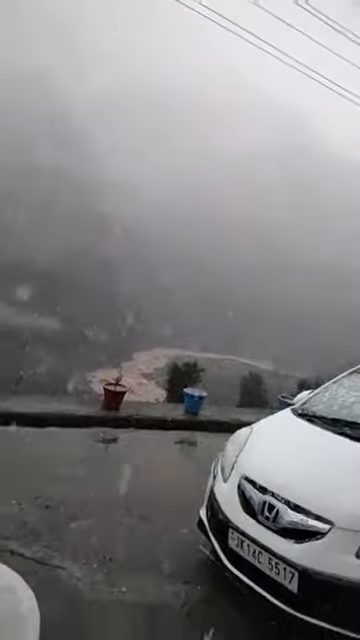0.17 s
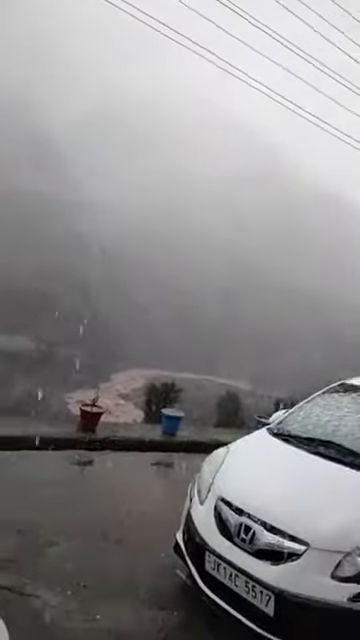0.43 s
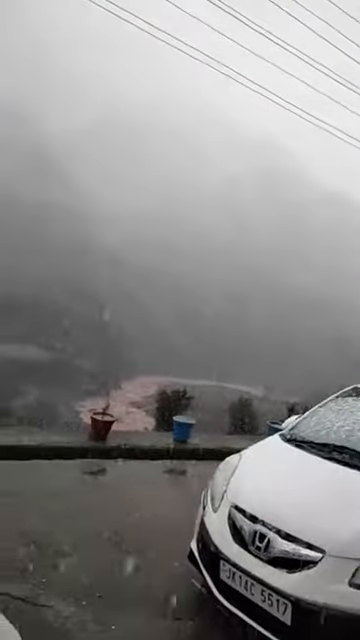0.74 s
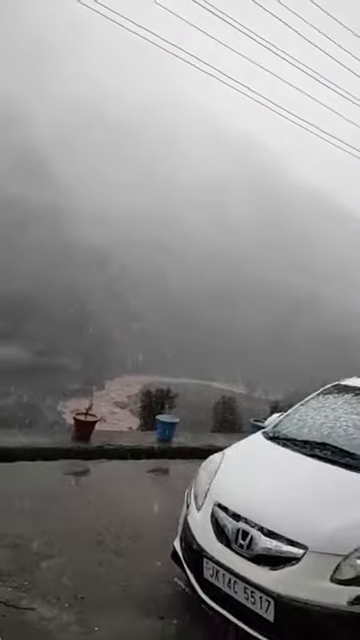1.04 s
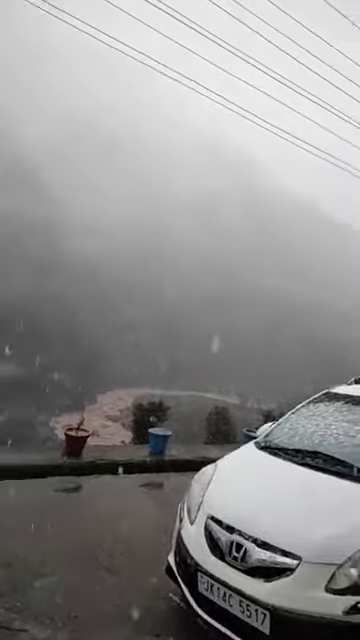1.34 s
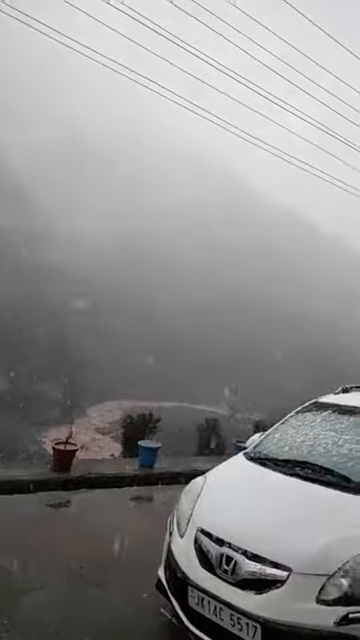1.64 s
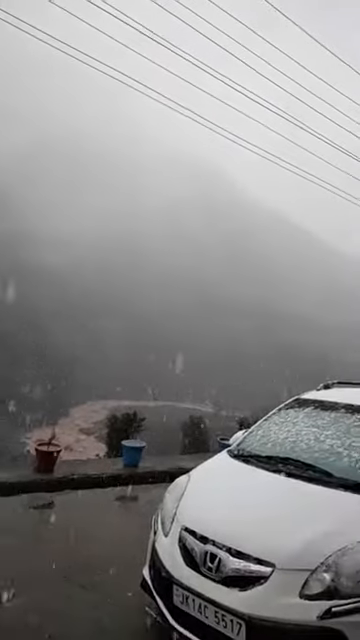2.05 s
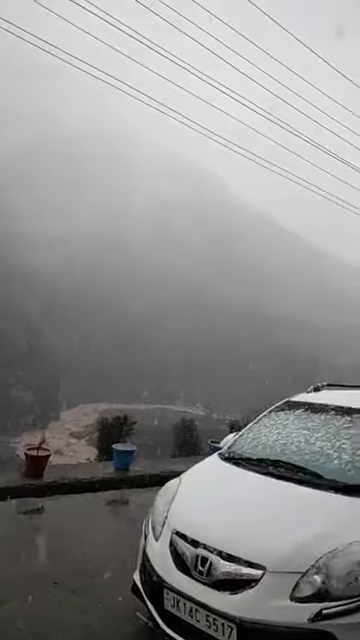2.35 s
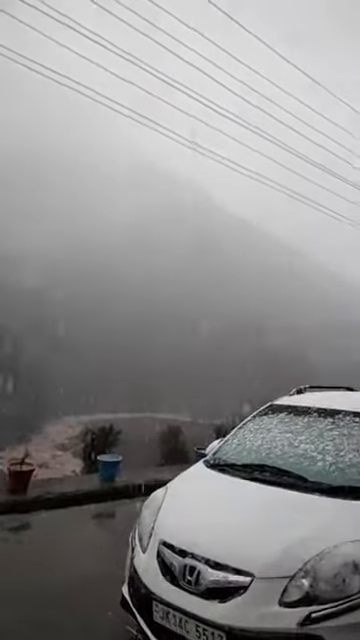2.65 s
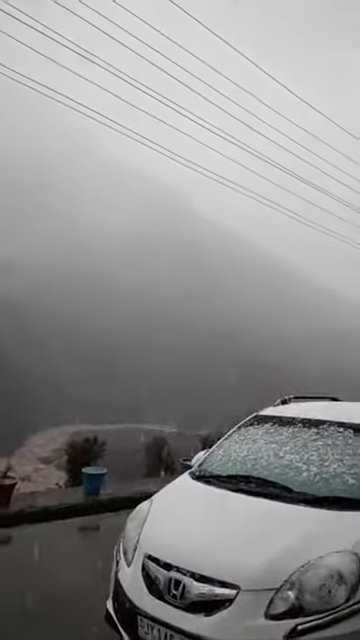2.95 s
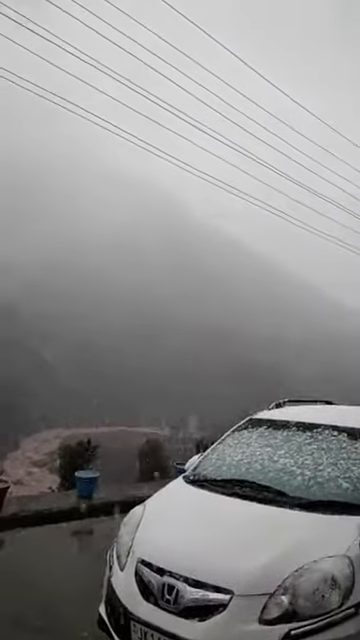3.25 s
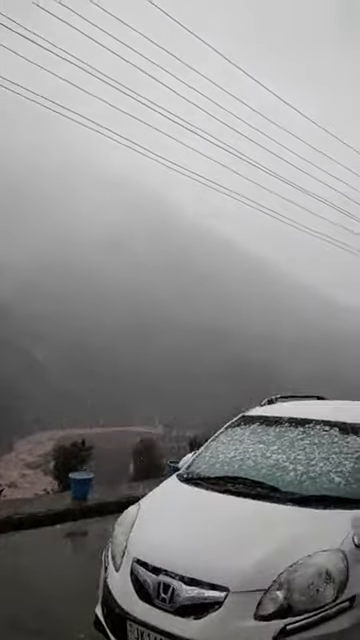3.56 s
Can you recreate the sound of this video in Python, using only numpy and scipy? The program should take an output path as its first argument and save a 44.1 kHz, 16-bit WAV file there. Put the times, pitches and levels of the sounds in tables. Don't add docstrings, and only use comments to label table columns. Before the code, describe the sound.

Steady sleet patters with crisp slushy splats and icy ticks in a yard, distant engine humming

```python
import sys
import numpy as np
from scipy import signal
from scipy.fft import rfft, irfft, next_fast_len
from scipy.io import wavfile
from scipy.ndimage import uniform_filter1d, map_coordinates

SR = 44100
rng = np.random.default_rng(int(sys.argv[2]) if len(sys.argv) > 2 else 0)


def unload_audio(sound):
    columns = np.transpose(np.atleast_2d(sound))
    steps = np.round(np.clip(columns, -1, 1) * 32767)
    wavfile.write(sys.argv[1], SR, steps.astype(np.int16))


def undo_db(level):
    steps = np.asarray(level, float) / 20
    return 10 ** steps


N = 163170


def unit(x):
    return x / np.sqrt(np.mean(x ** 2) + 1e-20)


def along(points, hz):
    f, v = np.transpose(points)
    return np.interp(np.log(hz + 1), np.log(f + 1), v, left=-70, right=-70)


def curves(rows):
    s, *cols = np.transpose(rows)
    return [np.interp(np.arange(N) / SR, s, c) for c in cols]


def wobble(rate):
    return map_coordinates(rng.standard_normal(200), [np.arange(N) * min(rate, 50) / SR])


def filtered(x, response):
    m = next_fast_len(N + SR // 2)
    return irfft(rfft(x, m) * response(np.fft.rfftfreq(m, 1 / SR)), m)[..., :N]


def coloured(x, spectrum):
    f = np.linspace(0, SR / 2, 4000)
    rms = np.sqrt(np.mean(undo_db(along(spectrum, f)) ** 2))
    return filtered(x, lambda hz: undo_db(along(spectrum, hz))) / rms


def patches(shape, wide, long):
    field = uniform_filter1d(rng.standard_normal(shape), size=wide, axis=-2)
    return unit(uniform_filter1d(field, size=long, axis=-1))


def rush(spectrum, patchy_db, wide=6, long=12):
    z = signal.stft(rng.standard_normal(N), nperseg=512)[2]
    z = z * undo_db(patchy_db * patches(z.shape, wide, long))
    return unit(coloured(signal.istft(z, nperseg=512)[1][:N], spectrum))


def mixed_at(s, waves):
    at = np.round(s * SR).astype(int) + np.arange(waves.shape[1])
    return np.bincount(at.ravel(), waves.ravel(), N + SR)[:N]


def droplets():
    per_s, scatter_db, top_db, mist = 2900, 5.5, 8, 0.14
    draw = rng.random((3, N))
    size = undo_db(np.minimum(-scatter_db * np.log(draw[1] + 1e-9), top_db))
    clicks = (draw[0] < per_s / SR) * size * np.sign(draw[2] - .5)
    return unit(clicks + mist * rng.standard_normal(N))


# start in seconds, peak in dB, spray t60 in seconds,
# dull part over bright part in dB.
NEAR_SPLATS = [(0.0277, -45.5, 0.13, 0), (0.184, -41, 0.03, -16), (0.2262, -34, 0.073, -25),
               (0.2882, -49.5, 0.066, -5), (0.3272, -39, 0.11, -13), (0.4226, -33.5, 0.084, -25),
               (0.5085, -34, 0.12, -24), (0.6569, -37.5, 0.06, -17), (0.6714, -53, 0.064, -18.5),
               (0.677, -39, 0.1, -12), (0.743, -44.5, 0.14, -12.5), (1.0438, -40.5, 0.26, -23),
               (1.0825, -36, 0.12, -13.5), (1.2125, -31, 0.048, -33.5), (1.297, -29.5, 0.074, -21.5),
               (1.3357, -40, 0.073, -15), (1.701, -40, 0.098, -6.5), (2.177, -47, 0.18, -30),
               (2.199, -38, 0.098, -18), (2.218, -44.5, 0.15, -11), (2.268, -38.5, 0.043, -13),
               (2.343, -39, 0.15, -26), (2.6216, -34, 0.087, -27), (2.734, -28.5, 0.077, -32),
               (2.7591, -44.5, 0.21, -26), (2.935, -25, 0.08, -35), (3.0114, -55.5, 0.098, 1.5),
               (3.1246, -38, 0.14, -12.5), (3.31, -41, 0.085, -13), (3.4985, -36, 0.048, -26)]
# start in seconds, peak in dB, t60 in seconds, dull over bright in dB, rise in seconds.
LOOSE_SPRAYS = [(.044, -51, 0.096, 4, 0.0044), (.239, -47, .08, -17, .004), (.345, -40, .09, -12, .008),
                (.595, -41, .07, -9, .006), (.752, -41.5, 0.099, -5, 0.0022), (.865, -37.5, 0.26, -24, .02),
                (.925, -42, .1, -20, 0.0092), (0.944, -42.5, .04, -12, .001), (.99, -39, .12, -19, .012),
                (1.096, -38, 0.16, -24, 0.015), (1.174, -46, .06, -10, 0.0018),
                (1.261, -42, 0.052, -16, .001), (1.35, -34, 0.26, -26, 0.022),
                (1.569, -33, 0.067, -31, 0.0036), (1.644, -36.5, .09, -11, 0.0049),
                (1.955, -36, 0.13, -15, 0.007), (2.428, -38, 0.088, -13, .004),
                (2.476, -37.5, .08, -12.5, .004), (2.96, -47.5, 0.13, 4, 0.0095),
                (3.134, -41, 0.033, -21, .001), (3.16, -38, 0.11, -23, .015),
                (3.268, -28.5, 0.25, -17, 0.028), (3.4, -38.5, 0.13, -13, 0.0045),
                (3.584, -36, 0.08, -11, 0.0035)]
# frequency in Hz, level in dB.
CONCRETE = [(6000, -31.5), (9000, -6), (11000, -4), (12500, -4), (15000, -13)]
# frequency in Hz, level in dB.
DULL_COLOUR = [(1500, -38), (4000, -1.5), (6500, 3.5), (9500, -2.5), (14000, -36)]


def splats():
    splat_db, dull_extra_db, dull_t60_s = -16, 12, 0.36
    impact_db, impact_t60_s, near_rise_s = 5.5, 0.0078, 0.001
    t = np.arange(SR // 4) / SR
    burst, spray = rng.standard_normal(N + SR), np.pad(droplets(), (0, SR))
    bright, dull = np.zeros(N + SR), np.zeros(N + SR)
    near = [(*row, near_rise_s) for row in NEAR_SPLATS]
    for s, db, t60, dull_db, rise in near + LOOSE_SPRAYS:
        start = round(s * SR)
        at = slice(start, start + len(t))
        impact = undo_db(impact_db - 60 * t / impact_t60_s) * burst[at]
        wave = (1 - np.exp(-t / rise)) * (undo_db(-60 * t / t60) * spray[at] + impact)
        bright[at] += undo_db(db + splat_db) * wave
        dull[at] += undo_db(db + splat_db + dull_db + dull_extra_db - 60 * t / dull_t60_s) * wave
    return coloured(bright[:N], CONCRETE) + coloured(dull[:N], DULL_COLOUR)


# frequency in Hz, level in dB.
PATTER_COLOUR = [(3000, -23.5), (6000, -22), (9000, 5.5), (12000, 5), (15000, -10)]


def patter(fall_db):
    per_s, scatter_db, top_db, t60_s = 110, 12, 7, 0.024
    level_db, grows, patchy_db = -70, 1.4, 2.5
    draw = rng.random((2, N))
    size_db = np.minimum(-scatter_db * np.log(draw[1] + 1e-9), top_db)
    hits = (draw[0] < per_s / SR) * undo_db(size_db) ** 2
    power = signal.lfilter([1], [1, -undo_db(-120 / (t60_s * SR))], hits)
    envelope = np.sqrt(power + .4 * power.mean())
    fizz = unit(envelope * rush(PATTER_COLOUR, patchy_db, wide=30, long=5))
    return undo_db(level_db + grows * fall_db + 1.1 * wobble(3.6)) * fizz


# start in seconds, peak in dB, pitch in Hz.
HARD_PELLETS = [(.028, -32, 8000), (.0425, -38, 8000), (.183, -31, 10500), (.289, -39, 8500),
                (.302, -39, 8000), (.327, -31, 9500), (.478, -46, 9000), (.51, -36, 8500),
                (.674, -35, 8000), (.68, -38, 8200), (.749, -36, 9500), (.752, -38, 8300),
                (.832, -46, 9200), (1.085, -36, 5800), (1.337, -42, 9600), (1.701, -31, 9500),
                (2.177, -35, 12000), (2.22, -38, 6800), (2.938, -34, 6200), (2.978, -40, 5200),
                (3.007, -31, 7000), (3.0082, -35, 4000), (3.0105, -38, 2200), (3.126, -33, 8500),
                (3.313, -28, 10000), (3.383, -42, 8200), (3.41, -36, 8000), (3.479, -39, 8500),
                (3.501, -34, 9500), (3.585, -37, 8000), (3.593, -38, 7500)]


def pellets():
    per_s, centre_hz, pitch_spread = 110, 9300, .2
    small_db, scatter_db = -57, 3
    cycles, bounce_s, bounce_db = 3, .0013, -5
    draw = rng.random((600, 2))
    s = np.cumsum(-np.log(draw[:, 0]) / per_s)
    small_peak_db = small_db - scatter_db * np.log(draw[:, 1])
    small_hz = centre_hz * np.exp(pitch_spread * rng.standard_normal(600))
    small = np.c_[s, small_peak_db, small_hz]
    s, db, hz = np.r_[HARD_PELLETS, small[s < N / SR]].T[..., None]
    t = np.arange(256) / SR

    def tick(u):
        decay = undo_db(-60 * np.abs(u) * hz / (2 * cycles))
        return (u > 0) * np.sin(2 * np.pi * hz * u) * decay

    return mixed_at(s, undo_db(db) * (tick(t) + undo_db(bounce_db) * tick(t - bounce_s)))


# start in seconds, peak in dB, pitch
# in Hz, t60 in seconds.
RINGING_GRAINS = [(.674, -44, 6500, .004), (.68, -35, 8300, .005), (0.749, -34.5, 9600, .005),
                  (0.751, -34, 8200, .005), (1.701, -44, 7500, .005), (1.85, -44, 9010, .005),
                  (2.003, -43, 9300, .008), (2.178, -44, 11300, .005), (2.202, -40, 10000, .01),
                  (2.22, -45, 6300, .006), (2.27, -45, 10360, .008), (2.347, -42, 7800, .006),
                  (2.364, -43, 5000, .002), (2.482, -43, 8310, .008), (2.657, -45, 9200, .006),
                  (2.763, -39, 8800, .006), (2.781, -42, 7500, .005), (2.938, -29, 12300, 0.0032),
                  (2.9405, -33, 10500, .005), (2.946, -43, 11100, 0.005), (2.95, -44, 10400, .008),
                  (2.956, -39.5, 4900, .005), (2.977, -45, 5500, .006), (3.0072, -36, 5900, .006),
                  (3.009, -36.5, 7800, 0.0057), (3.313, -36.5, 11100, 0.0047), (3.317, -42, 9400, .006)]


def clinks():
    rise_s, pair_ratio = 0.00025, 1.09
    s, db, hz, t60 = np.transpose(RINGING_GRAINS)[..., None]
    t = np.arange(600) / SR
    turn = 2 * np.pi * rng.random((len(s), 1))
    modes = np.sin(2 * np.pi * hz * t) + np.sin(2 * np.pi * hz * t / pair_ratio + turn)
    return mixed_at(s, undo_db(db - 60 * t / t60) * (1 - np.exp(-t / rise_s)) * modes)


# frequency in Hz, level in dB.
WASH_COLOUR = [(250, -0.5), (500, -2), (900, -1.5), (1500, -1), (2250, -5.5), (2600, -10.5), (4500, -16.5),
               (7000, -19.5), (15000, -22)]


def wash(fall_db):
    return undo_db(-48.5 + fall_db + 0.078 * wobble(3.9)) * rush(WASH_COLOUR, patchy_db=0.98)


# time in seconds, firing rate in Hz, level in dB.
IDLING = [(0, 67.9, -52.5), (.36, 69.15, -47.5), (.62, 68.25, -59), (.75, 69.5, -43), (1.12, 69.4, -51),
          (1.25, 67.7, -47.5), (1.36, 68.8, -47.5), (1.6, 69.17, -44.5), (2.25, 69.46, -44),
          (2.42, 69.8, -48), (2.6, 68.8, -40.5), (2.8, 67.78, -43.5), (3.3, 67.87, -39.5),
          (3.6, 67.4, -44.5)]
# multiple of the firing rate, level in dB, unsteadiness as a factor.
ORDERS = [
    (.5, -10, 2.3),
    (1, 1.5, 1.66),
    (1.5, -10.5, 3.3),
    (2, -10.5, 3.6),
    (3, -12.5, 5.1),
]
# frequency in Hz, level in dB.
RUMBLE_COLOUR = [(12, -12), (24, 0), (52, -2.5), (100, -1), (150, 1), (210, -2.5), (260, -8), (700, -19)]


def engine():
    wander_hz, flutter_db = .5, 0.69
    upper_follows = 0.55
    firing_hz, level_db = curves(IDLING)
    phase = 2 * np.pi * np.cumsum(firing_hz + wander_hz * wobble(9)) / SR
    swell_db = level_db - level_db.mean()
    hum = np.zeros(N)
    for k, db, shaky in ORDERS:
        follows = 1 if k == 1 else upper_follows
        order_db = db + follows * swell_db + shaky * flutter_db * wobble(8)
        hum += undo_db(order_db) * np.sin(k * phase + 0.27 * shaky * wobble(12))
    rumble = undo_db(-42 + 0.67 * wobble(4.0)) * rush(RUMBLE_COLOUR, patchy_db=0.5)
    return np.sqrt(2) * undo_db(level_db.mean()) * hum + rumble


# middle in seconds, peak in dB, pitch in Hz, length in seconds.
ROAD_SWELLS = [(0.243, -45, 136, 0.18), (.9, -45, 179.6, 0.16), (1.064, -53, 192, 0.14),
               (1.455, -44, 141, 0.14), (1.523, -43.5, 194.8, .12), (1.869, -42.5, 151.3, 0.18),
               (2.23, -48, 125, 0.21), (2.402, -57, 190, 0.1), (2.647, -46.5, 137.4, 0.14),
               (2.943, -40.5, 136.1, 0.19), (3.2, -45.5, 182, 0.2), (3.526, -47, 133, 0.22)]


def road_swells():
    t = np.arange(N) / SR
    drift = 0.5 * wobble(14)
    out = np.zeros(N)
    for s, db, hz, long in ROAD_SWELLS:
        swell = np.exp(-.5 * (4 * (t - s) / long) ** 2)
        out += undo_db(db) * np.sqrt(2) * swell * np.sin(2 * np.pi * hz * t + drift)
    return out


# time in seconds, level in dB.
FALL_STRENGTH = [(0, 0), (.3, 0.5), (.6, 0.35), (.9, 0), (1.25, 0.5), (1.5, 0.2), (1.9, 0.5), (2.3, 0.7),
                 (2.6, 1.2), (2.9, 1), (3.1, 1.1), (3.35, 0.5), (3.62, 0.5)]


def scene():
    fall_db, = curves(FALL_STRENGTH)
    sleet = splats() + patter(fall_db) + pellets() + clinks() + wash(fall_db)
    return (sleet + engine() + road_swells())[None]


def thinned(x):
    hole_hz, width_hz, rarity, hole_db = 6400, 2600, 1.5, -15
    hz, _, z = signal.stft(x, SR, nperseg=1024)
    threshold = rarity + ((hz[:, None] - hole_hz) / width_hz) ** 2
    gain = np.where(patches(z.shape, wide=5, long=4) > threshold, undo_db(hole_db), 1)
    return signal.istft(z * gain, SR, nperseg=1024)[1][..., :N]


def microphone(x):
    port_hz, width_hz, port_db = 10640, 1660, 5
    top_hz, slope_hz = 14280, 40

    def response(f):
        damping = 1j * f * width_hz
        port = 1 + undo_db(port_db) * damping / (port_hz ** 2 - f * f + damping)
        return port / (1 + np.exp(np.clip((f - top_hz) / slope_hz, -30, 30)))

    return filtered(x, response)


# start in seconds, end in seconds.
BREAKS = [
    (2.0465, 2.1555),
    (3.6245, 3.8),
]


def dropouts(x):
    t = np.arange(N) / SR
    kept = np.prod([(t < a) | (t > b) for a, b in BREAKS], axis=0)
    return x * uniform_filter1d(kept * 1., size=24)


# start in seconds, end in seconds, low edge in Hz,
# high edge in Hz, level in dB.
FAINT_BANDS = [(2.017, 2.066, 14420, 15700, -90), (2.044, 2.064, 9500, 14100, -72),
               (2.045, 2.099, 200, 495, -87), (2.141, 2.167, 9700, 14000, -70),
               (2.141, 2.157, 60, 900, -81), (2.142, 2.195, 14600, 15800, -93),
               (2.343, 2.386, 14400, 15500, -87), (3.633, 3.645, 14500, 16000, -97),
               (3.61, 3.646, 9700, 14300, -67)]


def faint_bands():
    t = np.arange(N) / SR
    out = np.zeros(N)
    for a, b, low, high, db in FAINT_BANDS:
        band = unit(filtered(rng.standard_normal(N), lambda f: (f > low) & (f < high)))
        window = np.sqrt(np.abs(np.sin(np.pi * np.clip((t - a) / (b - a), 0, 1))))
        out += undo_db(db) * window * band
    return out


def roll_off(x):
    return signal.sosfilt(signal.butter(12, 15610, fs=SR, output="sos"), x)


def record(dry):
    mix = dropouts(microphone(thinned(dry))) + faint_bands()
    return roll_off(mix)


dry = scene()
out = record(dry)
unload_audio(out)
```